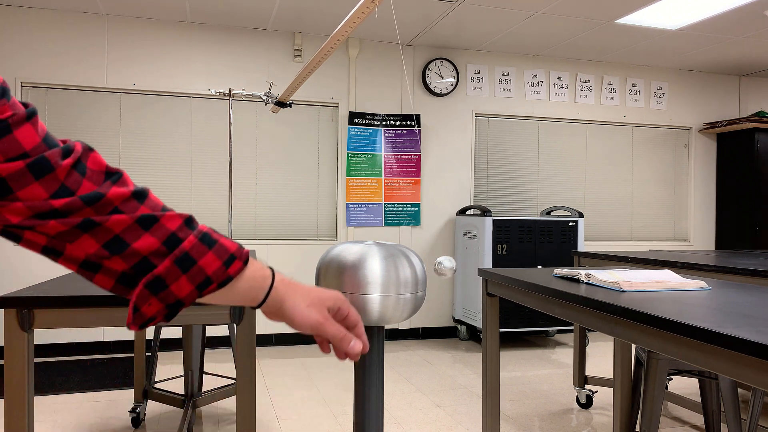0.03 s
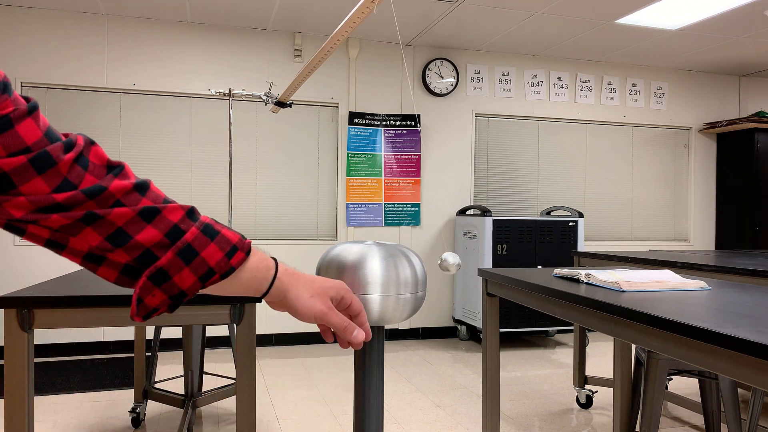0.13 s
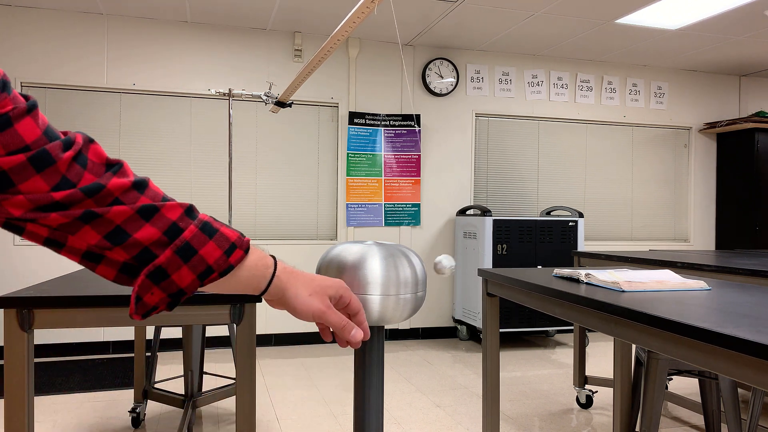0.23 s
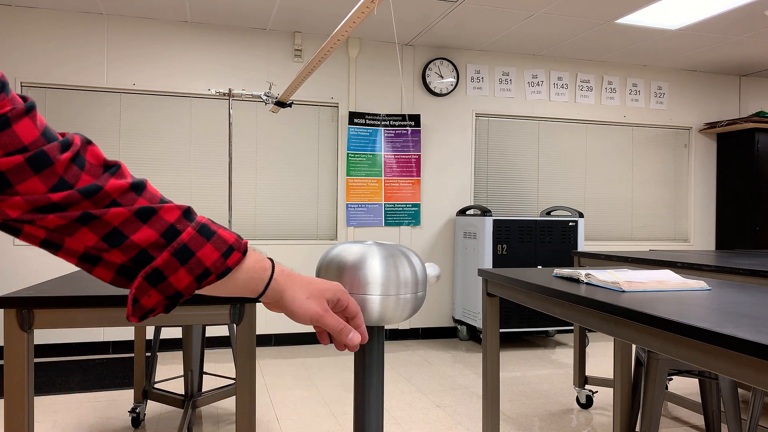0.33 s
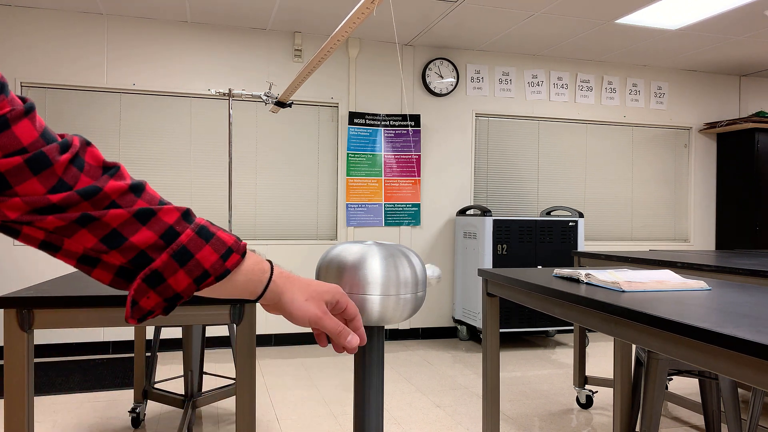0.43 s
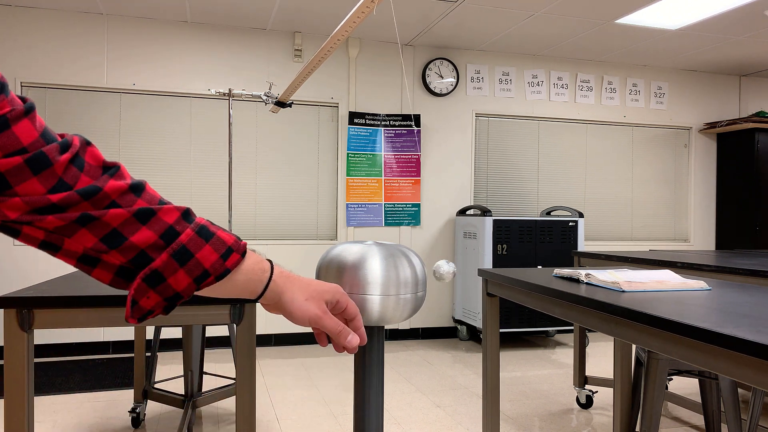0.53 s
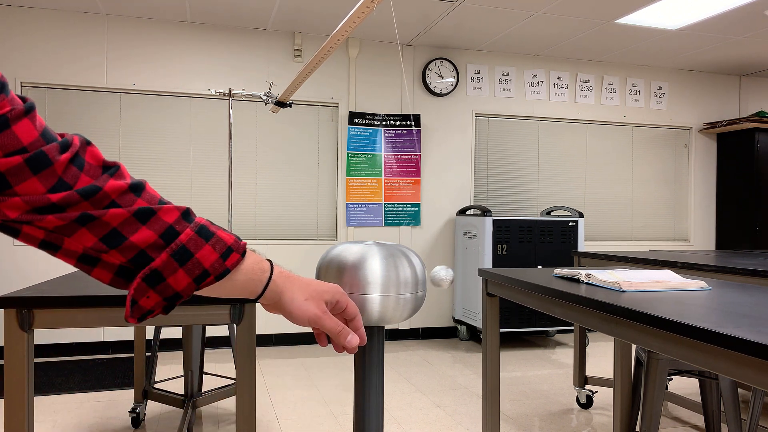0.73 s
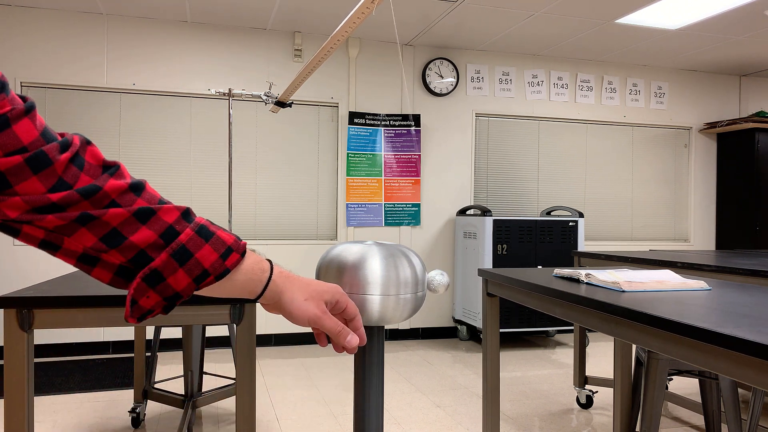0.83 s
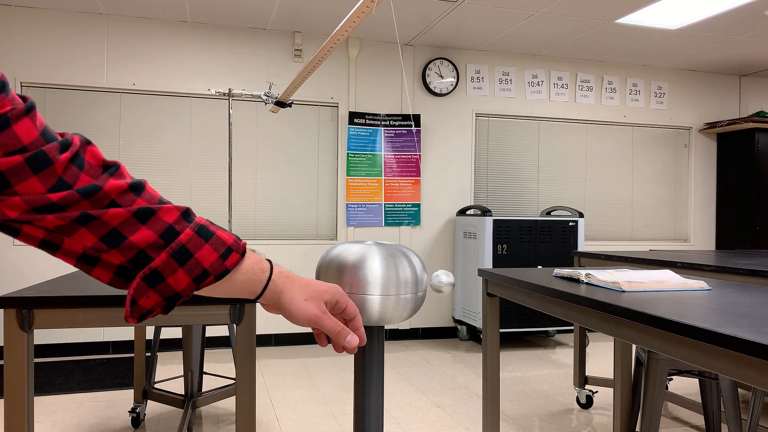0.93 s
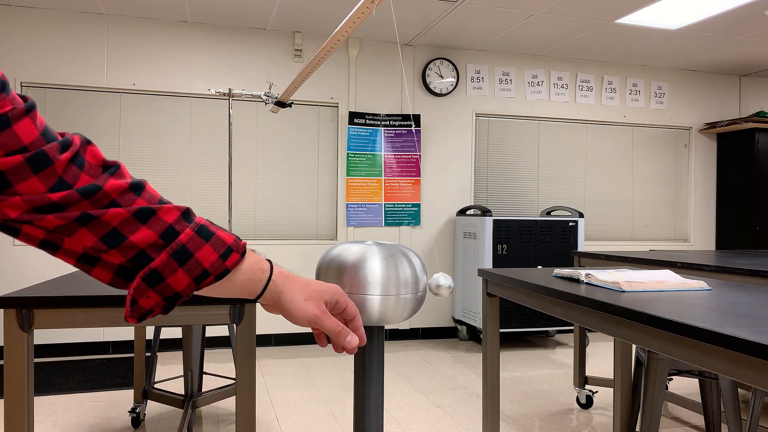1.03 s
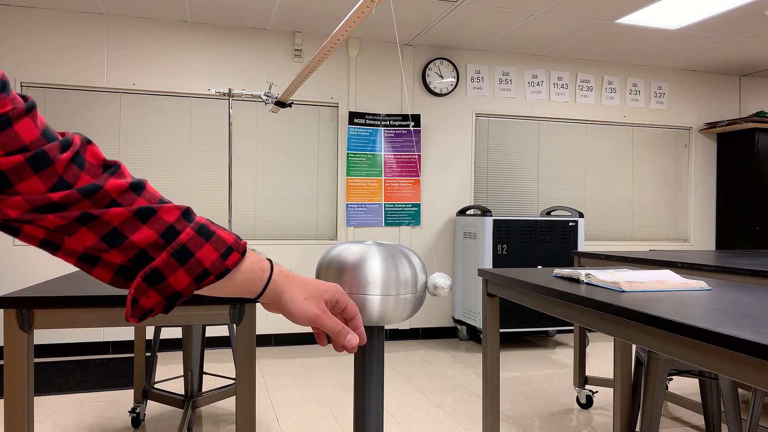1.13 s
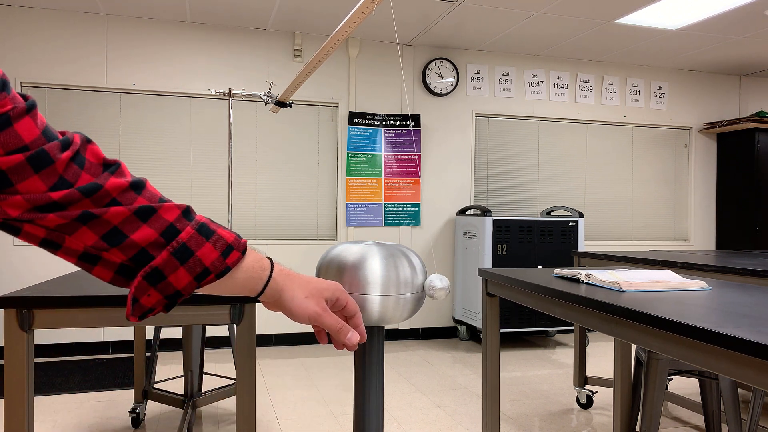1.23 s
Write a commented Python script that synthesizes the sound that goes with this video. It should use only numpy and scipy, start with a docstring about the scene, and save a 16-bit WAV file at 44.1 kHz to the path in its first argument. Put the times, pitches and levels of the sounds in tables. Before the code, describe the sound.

One sharp electric spark cracks off a charged metal sphere, overloading the nearby microphone and echoing briefly around a classroom. Then come a ringing metal knock, a soft hollow boom and three faint ticks, with ventilation rumbling quietly underneath.

```python
"""Static spark in a classroom

A spark snaps between a charged metal sphere and a hand, close to a phone in a quiet classroom.
The crack overloads the microphones, bounces off nearby tables and dies away in the room.
A metallic knock and three faint ticks follow; a hollow boom swells after the knock and the first tick.
Ventilation rumbles and hisses underneath."""
import sys
import numpy as np
from scipy import signal
from scipy.fft import rfft, irfft
from scipy.io import wavfile
from scipy.ndimage import uniform_filter1d

SR = 44100
rng = np.random.default_rng(int(sys.argv[2]) if len(sys.argv) > 2 else 0)


def digitize_waveform(pressure):
    """Quantize a signal to 16-bit integers and store it at the path in sys.argv[1].

    Rows of a 2-D input are taken as channels; values are limited to [-1, 1].
    """
    field = np.atleast_2d(pressure).T
    bounded = np.clip(field, -1, 1)
    quanta = np.round(bounded * 32767).astype(np.int16)
    wavfile.write(sys.argv[1], SR, quanta)


N = 57330
TOP_HZ = 15900  # the phone cuts the treble above this


def spark(start_s=.2004, crack_db=13, room_db=15.5, left_lag_s=.00019):
    """One spike of air pressure, followed by bright echoes and the fading sound of the room."""
    # Tone of the crack: pitch_hz, level_db
    crack_tone = [(60, -18), (200, -13), (450, -9), (900, -6), (1500, -3), (2200, 0), (3200, -4), (4300, 0),
                  (6000, -4), (8200, 1), (10500, -1), (14000, -3), (16000, -6)]
    # The left microphone is shaded from the spark: pitch_hz, gain_db
    left_shade = [(300, 1), (1200, -13.5), (2500, -10), (5500, -7), (8000, 4), (14000, -2)]
    # How nearby surfaces change the tone: pitch_hz, gain_db
    echo_tone = [(100, -19), (1000, -14), (3000, 0), (6000, -16.5), (9000, 4), (14000, 3)]
    # Tone of the spark's tail in the room: pitch_hz, gain_db
    tail_tone = [(60, -21.5), (200, -23), (350, -21.5), (480, -12), (650, -18), (1200, -17.5), (2200, -7.5),
                 (3200, -8), (4500, -4), (6500, -6), (9500, 4), (11500, -5.5), (14000, 6), (16000, -5)]
    # Faint low ring that the spark leaves: pitch_hz, level_db, fade_s
    after_ring = [(460, -43.5, 0.092)]
    crack = smear(colour(signal.unit_impulse(N), crack_tone)) * undb(crack_db)
    left = delay(colour(crack, left_shade), left_lag_s)
    direct = np.array([left, crack])
    echoes = through(colour(crack, echo_tone), nearby_echoes())
    tail = undb(room_db) * colour(classroom(), tail_tone)
    return delay(direct + echoes + tail + ring(after_ring), start_s)


def smear(x, bass_lag_s=.00056):
    """The bass trails the treble, which spreads a spike into a tiny downward sweep."""
    lag_s = bass_lag_s * np.maximum(1 - pitches() / TOP_HZ, 0)
    cycles = np.cumsum(lag_s) * pitches()[1]
    return irfft(rfft(x, 2 * N) * np.exp(-2j * np.pi * cycles))[..., :N]


def knocks():
    """Each knock or tick is a blow and a brief scrape that rings the metal and echoes in the room."""
    # The hits: start_s, level_db, scrape_db, scrape_s, tilt_db_per_octave, ring_db, room_db
    hits = [(.4914, -1.5, 1, 0.0031, 2, 6, 4), (0.9023, -27, 5, .007, 2, -9.5, -3.5),
            (1.1161, -31.5, 1, .002, 5.5, 0.5, -4.5), (1.2424, -37, 1, .002, 0, -7, -2)]
    # Tone of the contact: pitch_hz, level_db
    contact_tone = [(60, -12.5), (200, -3), (400, -1), (650, -2), (1050, 4.5), (1500, -1.5), (2100, -5),
                    (3000, -14), (3800, -12.5), (5500, -9.5), (6800, -13), (8600, -8.5), (10500, -11.5),
                    (13300, -16), (16000, -22)]
    # Quiet notes of the struck metal: pitch_hz, level_db, fade_s
    metal_notes = [(1024, -42, .08), (1184, -45, 0.21), (1394, -54, .2), (1703, -50, .25),
                   (2093, -46, 0.29), (5030, -44.5, .18), (5780, -37, .07), (8520, -42.5, 0.15)]
    # The metal's main ping: pitch_hz, level_db, fade_s
    ping = [(5250, -19, .04)]
    # Tone of the knocks' tail in the room: pitch_hz, gain_db
    tail_tone = [(60, -10.5), (160, 3), (350, 13.5), (500, 4), (750, 4.5), (1150, 1), (1500, 1.5),
                 (2100, -4), (2900, -8), (4300, -19), (5200, 0.5), (6000, -3.5), (7000, -18.5),
                 (8600, -3.5), (10200, -7.5), (13400, -14.5), (15500, -13.5)]
    t = np.arange(N) / SR
    room = classroom()
    nearby = nearby_echoes() * undb(-4.5)
    ringing = ring(metal_notes) + ring(ping)
    out = 0
    for start_s, level_db, scrape_db, scrape_s, tilt_db, ring_db, room_db in hits:
        scrape = stereo_noise(alike_below_hz=2500) * np.exp(-t / scrape_s)
        push = signal.unit_impulse(N) + undb(scrape_db) * unit_energy(scrape)
        contact = colour(push, contact_tone, tilt_db)
        metal = ringing * undb(ring_db)
        direct = contact + at_microphones(metal, left_lag_s=.0001, left_db=-2.25, right_db=2.25)
        tail = colour(room, tail_tone, tilt_db) * undb(.5) + through(metal, room) * undb(-13)
        hit = direct + through(contact, nearby) + undb(room_db) * tail
        out = out + undb(level_db) * delay(hit, start_s)
    return out


def booms():
    """Low, hollow notes swell a moment after the two hardest hits."""
    # The booms: start_s, level_db, swell_s
    swells = [(0.493, -35, 0.026), (0.908, -45, 0.023)]
    # Notes that make up a boom: pitch_hz, level_db, fade_s
    low_notes = [(169.4, 1.5, 0.31), (215.5, 4, 0.23), (286.6, 9, 0.081), (320.5, 2, 0.27), (368, 0, 0.27)]
    t = np.arange(N) / SR
    body = sum(delay(ring([note]), rng.uniform(0, .006)) for note in low_notes)
    out = 0
    for start_s, level_db, swell_s in swells:
        rise = 1 - np.exp(-(t / swell_s) ** 2)
        out = out + delay(body * rise * undb(level_db), start_s)
    return out


def ring(notes):
    """A ringing object gives pure tones, each dying away by 60 dB in its fade_s."""
    t = np.arange(N) / SR
    return sum(undb(level_db) * np.sin(2 * np.pi * pitch_hz * t) * np.exp(-np.log(1000) * t / fade_s)
               for pitch_hz, level_db, fade_s in notes)


def nearby_echoes():
    """A click bounces off close surfaces and returns as a few separate echoes."""
    # Echoes off the sphere, tables and floor: delay_s, left_lag_s, left_db, right_db
    bounces = [(.00134, 0.0001, -8.5, -18), (.00243, 0.00023, -6, -9), (.00412, 0.00021, -6, -6),
               (.0068, 0.00024, -6, -6.5), (.0084, 0.000042, -16.5, -24.5), (0.0113, 0.00047, -13.5, -21),
               (0.0133, 0.00028, -15.5, -15)]
    click = signal.unit_impulse(N)
    return sum(at_microphones(delay(click, delay_s), left_lag_s, left_db, right_db)
               for delay_s, left_lag_s, left_db, right_db in bounces)


def classroom(build_s=.0014):
    """The room's answer to a click: dense echoes that build quickly and last longest in the bass."""
    # Time the room takes to fade by 60 dB: pitch_hz, fade_s
    fade_times = [(150, 1), (500, 0.35), (1200, 0.4), (2500, 0.36), (5000, 0.41), (9000, 0.36),
                  (15000, 0.3)]
    t = np.arange(N) / SR
    spectrum = rfft(stereo_noise(alike_below_hz=1020), 2 * N)
    tail = 0
    for band_hz, fade_s in fade_times:
        band = read_curve([(hz, hz == band_hz) for hz, _ in fade_times])
        tail = tail + irfft(spectrum * band)[:, :N] * np.exp(-np.log(1000) * t / fade_s)
    return unit_energy(tail * (1 - np.exp(-t / build_s)))


def ventilation(level_db=-55.5, waver_db=.5):
    """Moving air makes a gently wavering rumble under an even hiss."""
    # Tone of the rumble and hiss: pitch_hz, gain_db
    air_tone = [(20, -17.5), (50, -2.5), (90, -9), (200, -15.5), (330, -25), (600, -26), (1000, -31),
                (2000, -33), (3200, -35), (5000, -34), (7200, -41), (9200, -29.5), (11800, -42),
                (14000, -33), (15500, -42)]
    noise = colour(stereo_noise(alike_below_hz=900), air_tone)
    noise = noise * undb(level_db) / np.sqrt(np.mean(noise ** 2))
    rumble = signal.sosfilt(signal.butter(1, 200, fs=SR, output="sos"), noise)
    hiss = noise - rumble
    waver = np.interp(np.linspace(0, 1, N), np.linspace(0, 1, 20), rng.standard_normal(20))
    return hiss + rumble * undb(-waver_db * waver)


def stereo_noise(alike_below_hz):
    """Noise that is alike at both microphones in the bass and unrelated in the treble."""
    mid, side = rfft(rng.standard_normal((2, 2 * N)))
    alike = .94 / (1 + (pitches() / alike_below_hz) ** 2)
    mid, side = mid * np.sqrt(1 + alike), side * np.sqrt(1 - alike)
    return irfft(np.array([mid + side, mid - side]))[:, :N]


def at_microphones(x, left_lag_s, left_db, right_db):
    """A sound reaches the right microphone first, and each side has its own level."""
    return np.array([delay(x, left_lag_s) * undb(left_db), x * undb(right_db)])


def colour(x, tone, tilt_db=0):
    """Shape a sound's tone; tilt_db brightens it by that much per octave, pivoting at 2 kHz."""
    octaves = np.log2(np.maximum(pitches(), 200) / 2000)
    log_gain = np.log(undb(read_curve(tone) + tilt_db * octaves))
    # Fold the filter in time so that nothing sounds before the hit.
    folded = irfft(log_gain)
    folded[1:N] *= 2
    folded[N + 1:] = 0
    return irfft(rfft(x, 2 * N) * np.exp(rfft(folded)))[..., :N]


def through(x, echoes):
    """Give a sound a stereo pattern of echoes."""
    return irfft(rfft(x, 2 * N) * rfft(echoes, 2 * N))[:, :N]


def delay(x, delay_s):
    """The same sound, later."""
    return irfft(rfft(x, 2 * N) * np.exp(-2j * np.pi * pitches() * delay_s))[..., :N]


def read_curve(points):
    """Join a table's points to get a value at every pitch, with octaves evenly spaced."""
    pitch_hz, values = np.array(points, float).T
    return np.interp(np.log(np.maximum(pitches(), 1)), np.log(pitch_hz), values)


def pitches():
    """The frequencies, in Hz, in the spectrum of a sound twice the scene's length."""
    return np.arange(N + 1) * SR / (2 * N)


def unit_energy(x):
    """Scale a stereo sound to an average energy of 1 per side."""
    return x / np.sqrt(np.sum(x ** 2) / 2)


def undb(db):
    """Turn decibels into a multiplier."""
    return 10 ** (np.asarray(db) / 20)


def suppress_noise(x, deepest_cut_db=-4.5, let_go_db=13):
    """Turn each band of pitches down as it sinks towards its own background level."""
    bands = signal.stft(x, nperseg=512)[2]
    power = np.mean(abs(bands) ** 2, axis=0)
    power = uniform_filter1d(power, size=15, axis=0)  # smooth over pitch
    power = np.abs(uniform_filter1d(power, size=3, axis=1))  # and over time
    background = np.median(power, axis=1, keepdims=True) + 1e-18
    cut_db = deepest_cut_db / (1 + power / background / undb(let_go_db) ** 2)
    return signal.istft(bands * undb(cut_db))[1][:, :N]


def scene():
    """All the sounds as they reach the phone."""
    return spark() + knocks() + booms() + ventilation()


def record(dry):
    """The phone turns down noise, clips the loud crack and cuts the highest treble."""
    clipped = np.clip(suppress_noise(dry), -1, 1)
    treble_cut = signal.ellip(10, .2, 70, TOP_HZ, fs=SR, output="sos")
    return signal.sosfilt(treble_cut, clipped)


dry = scene()
out = record(dry)
digitize_waveform(out)
```